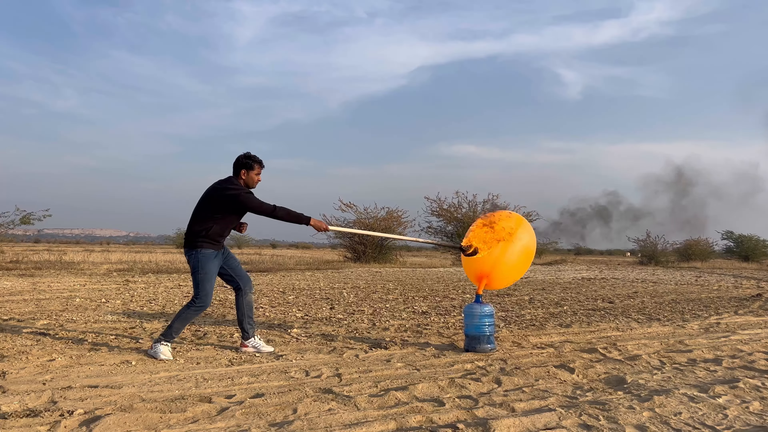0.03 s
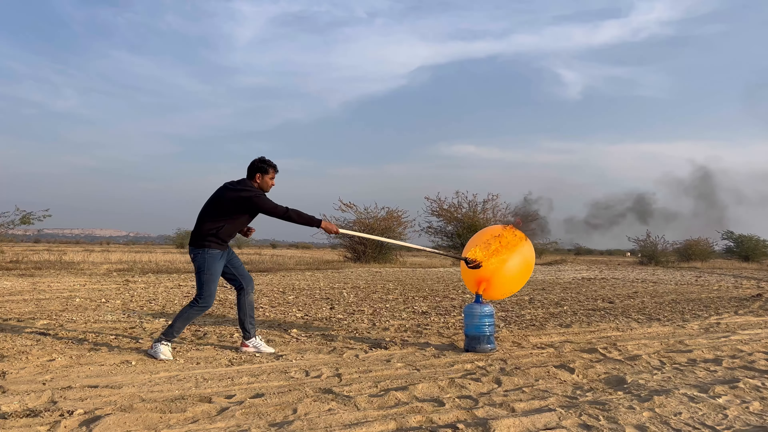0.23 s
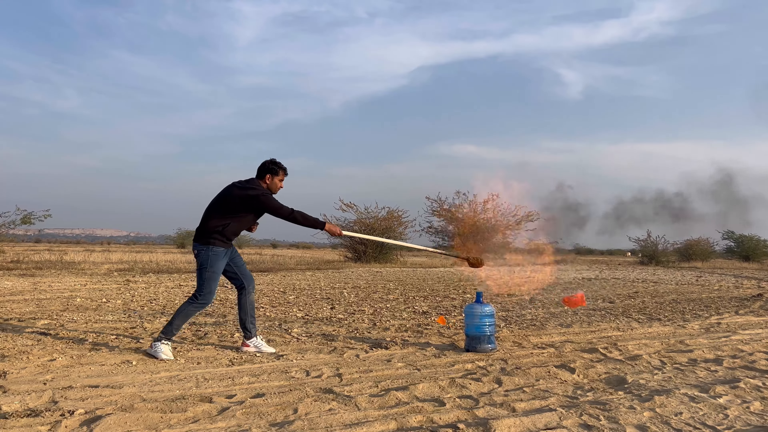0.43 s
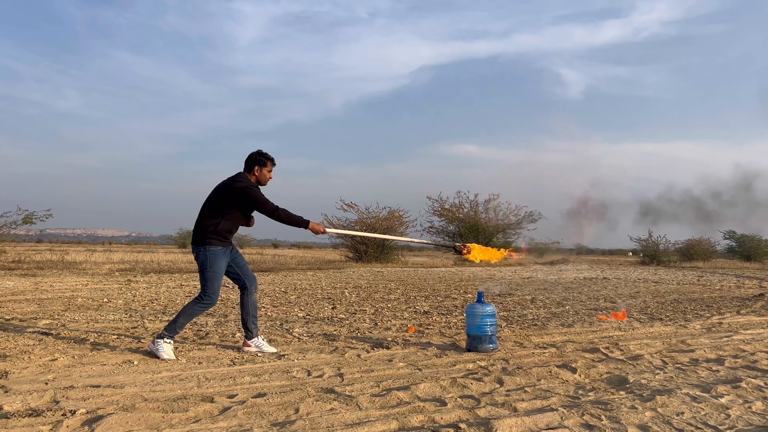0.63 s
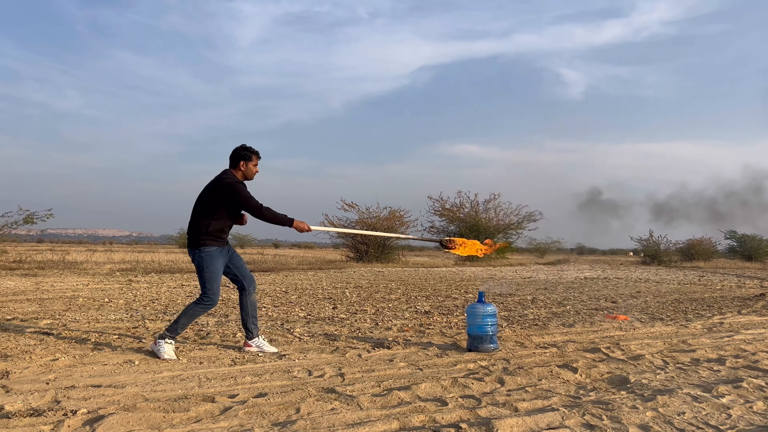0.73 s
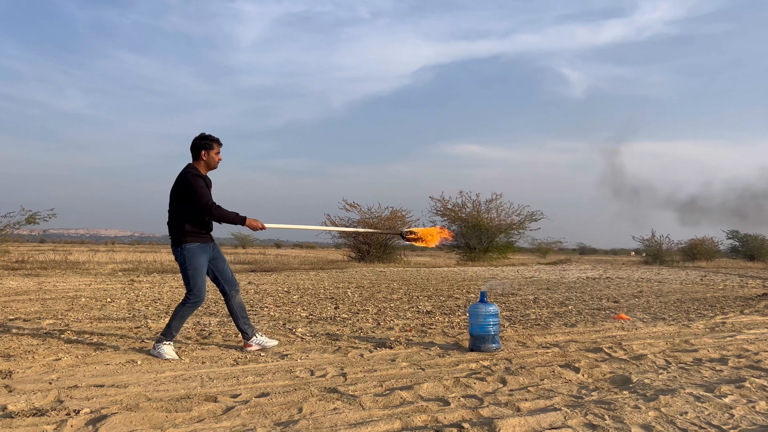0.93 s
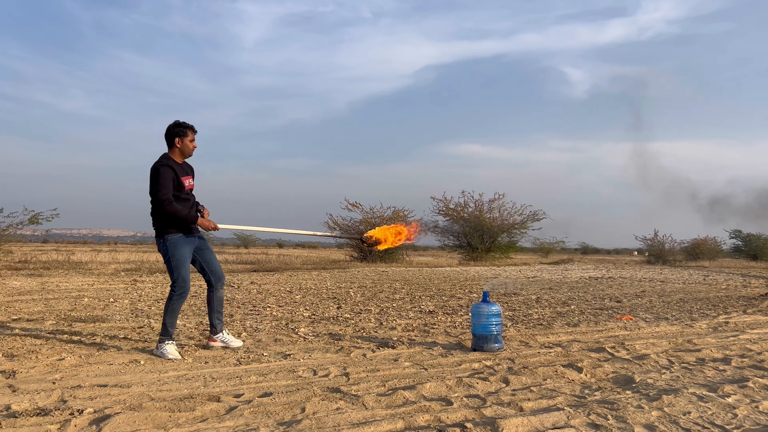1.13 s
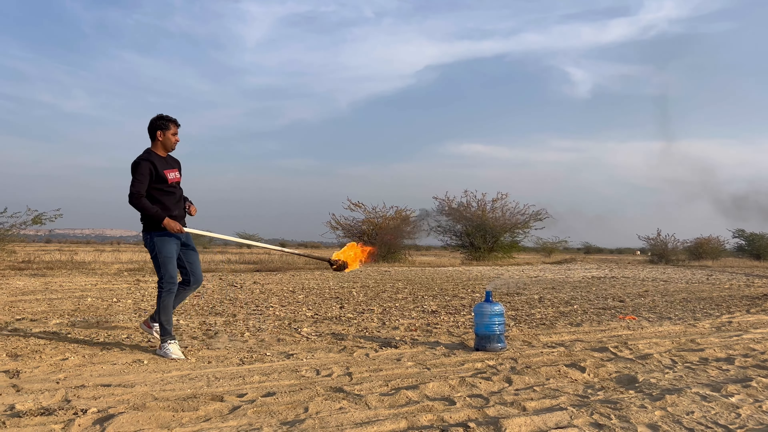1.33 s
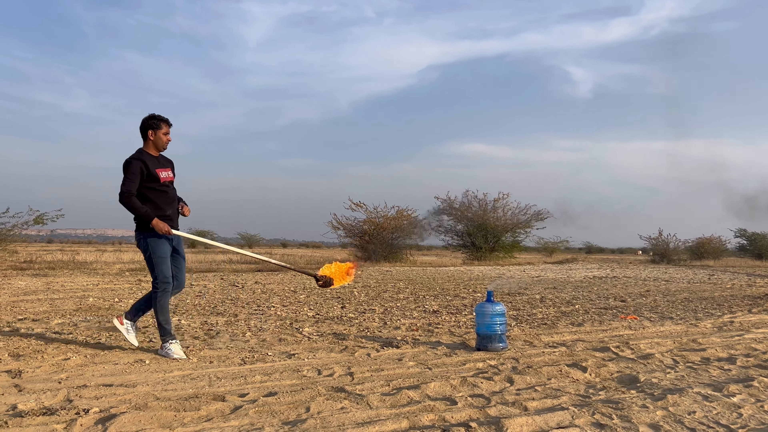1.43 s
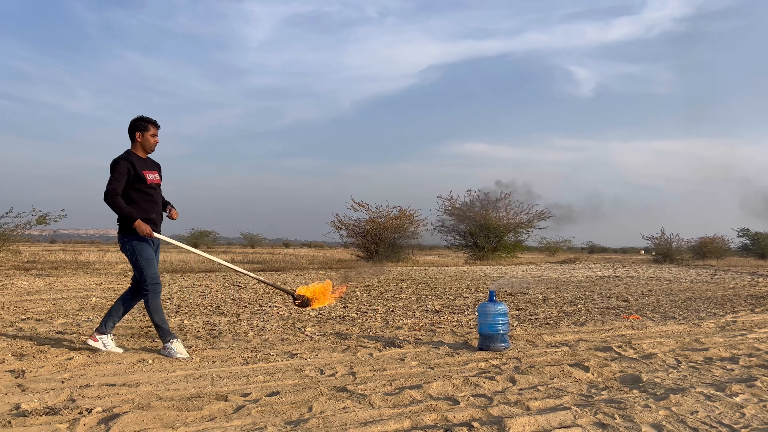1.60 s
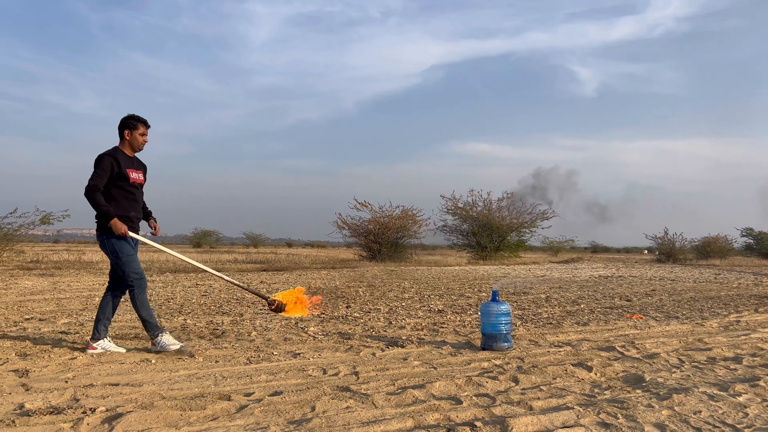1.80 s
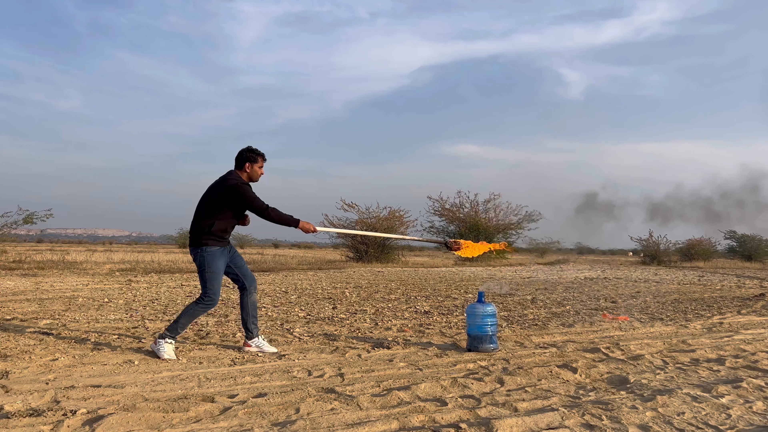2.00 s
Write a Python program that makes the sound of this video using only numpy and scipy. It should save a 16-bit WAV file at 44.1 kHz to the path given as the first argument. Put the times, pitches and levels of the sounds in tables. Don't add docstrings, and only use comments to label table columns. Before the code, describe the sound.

Single balloon gas explosion in an open field, a punchy boom followed by a rolling low rush

```python
import sys
import numpy as np
from scipy import signal
from scipy.io import wavfile

SR = 44100
rng = np.random.default_rng(int(sys.argv[2]) if len(sys.argv) > 2 else 0)


def master(y):
    cut = np.clip(np.atleast_2d(y).T, -1, 1)
    pcm = np.round(cut * 32767)
    wavfile.write(sys.argv[1], SR, pcm.astype(np.int16))


def volts_from_db(level):
    exponent = np.asarray(level, float) / 20
    return 10 ** exponent


N = 90669

# time in seconds, rumble level in dB, rush level in dB, rush tilt in dB per octave.
WIND_LEVELS = [(0, -42, -64, 4.5), (.08, -41.5, -70.5, -3), (.21, -45, -64, -4), (.245, -46, -52, -7.5),
               (.34, -46, -76.5, 4.2), (.42, -46.5, -76.5, 8.2), (.5, -45, -76, 1), (.57, -32, -55.5, 0),
               (.64, -25.5, -52.5, 2), (.81, -23.5, -54, 0.9), (.95, -38.5, -55.5, -1),
               (1.1, -31.5, -53.5, -0.4), (1.25, -31, -55.5, 0.7), (1.38, -27.5, -53.5, 0.9),
               (1.47, -40, -56.5, -1.6), (1.65, -34.5, -55.5, 0.5), (1.8, -38, -58, -1.5),
               (1.99, -34.5, -56.5, -0.7)]
# frequency in Hz, level in dB.
RUMBLE_SPECTRUM = [(20, -22), (30, -10.5), (55, 2.2), (110, -2), (200, -13), (400, -23), (560, -38),
                   (1000, -51)]
# frequency in Hz, level in dB.
RUSH_SPECTRUM = [(400, -12), (650, -3.5), (1400, -2), (1800, -18), (2250, -17.5), (5300, -30),
                 (7500, -42.5), (16300, -59.5)]
# frequency in Hz, side level against mid in dB.
WIND_SIDE = [(60, -78), (110, -75.5), (200, -63), (380, -60), (700, -30.5), (1290, -2.5), (2380, -5.5),
             (4400, -5), (8120, -4), (15000, -4)]
HISS_DB = -88.5

# start in seconds, frequency in Hz, peak in dB, swell time in seconds, sharpness (no unit).
FIREBALL_THROBS = [(.2502, 324, -6.5, 0.0086, 2.3), (.2575, 186., -5, .014, 1.6), (.251, 84., -9, .02, 1.8),
                   (.2805, 104.3, -1.5, .017, 5.8), (.2535, 405., -10.5, 0.0069, 1.6),
                   (.2555, 238., -9, 0.0055, 1.5), (.256, 53, -13, 0.018, 2.7),
                   (.2795, 172., -8, 0.0093, 2.2), (.3, 61, -22, 0.017, 2.25),
                   (.253, 1120., -19, 0.0065, 2.2), (.254, 1700., -20.5, .006, 2.2),
                   (.255, 665., -20, .007, 2.2), (.252, 555., -20, .006, 1.8), (.254, 870., -22, .005, 1.8),
                   (.2555, 1420., -24, .005, 1.8)]

CRACK_START_S, CRACK_RISE_S, CRACK_HOLD_S = 0.2515, 0.0045, 0.0065
CRACK_DB = -18.5
CRACK_DROP_S, CRACK_DROP_DB = 0.278, -12
EMBER_DB, EMBER_T60_S = -30, 0.14
CRACK_RIGHT = 0.39
# frequency in Hz, level in dB.
CRACK_SPECTRUM = [(300, -21), (480, -4), (800, -9), (1700, -14), (2500, -25.5), (4200, -25), (6500, -39.5),
                  (16300, -43.5)]
# frequency in Hz, time to fall by 60 dB in seconds.
CRACK_DECAY = [(500, 0.12), (1200, 0.041), (3000, 0.089), (7000, .16), (14000, 0.18)]
# frequency in Hz, side level against mid in dB.
CRACK_WIDTH = [(60, -65), (110, -67), (200, -70), (380, -54), (700, -18.5), (1290, -3.5), (2380, -11),
               (4400, -5.5), (8120, 0), (15000, -1)]

# time in seconds, peak in dB, highest frequency in Hz.
FLAME_TICKS = [
    (.667, -61, 8800),
    (0.705, -63.5, 9050),
    (0.837, -53, 7200),
    (1.038, -54, 5000.),
    (1.631, -54.5, 7900),
    (1.9576, -52.5, 15540),
    (1.9623, -58.5, 11000.),
    (.402, -64.5, 6000.),
]

# delay in seconds, level in dB, lowest Hz kept, highest Hz kept.
FIELD_ECHOES = [
    (.799, -17, 39.6, 150.),
    (.908, -26, 50., 196),
    (1.062, -19, 140., 600.),
    (1.091, -23, 200., 750.),
    (1.233, -34, 40.3, 196),
    (1.35, -28.5, 39.3, 414),
]
# start in seconds, frequency in Hz, peak in dB, swell time in seconds, sharpness (no unit).
HARD_KNOCKS = [
    (1.056, 783, -26.5, 0.0033, 2.6),
    (1.0565, 546, -30.5, 0.0037, 2.7),
    (1.058, 1270, -40, 0.0014, 2.1),
    (1.0575, 97., -13, 0.0092, 2.4),
    (1.1785, 101, -19, 0.0075, 1.8),
    (1.352, 750., -40, .002, 1.5),
    (1.054, 370., -28, .005, 1.8),
    (1.385, 623, -42, .002, 1.5),
    (1.036, 900., -44, .002, 1.5),
]

SPLICE_S = 1.98739
SPLICE_STEP_DB = -32
# start in seconds, frequency in Hz, peak in dB, swell time in seconds, sharpness (no unit).
SLOWED_SWELLS = [
    (1.988, 9.5, -18.5, .028, 2.2),
    (2.021, 36., -26, .008, 2.2),
    (2.04, 14., -20.5, .018, .8),
]
GRIT_DB, GRIT_TOP_HZ = -49, 260

# frequency in Hz, width in Hz, boost or dip in dB.
HOUSING_RESONANCES = [(1130, 150., 1), (1346, 81, 4.5), (2200, 280, 5), (3636, 170, 3.5), (5000, 400, 2),
                      (7480, 800., 4.5), (1782, 300, -4.5), (3030, 230, -1.5), (9880, 700., -9),
                      (13500, 500., -15.5), (15000, 1200., 3.5)]
# low edge in Hz, high edge in Hz.
ALIKE_BANDS = [(7200, 8300), (10900, 12400), (15000, 19000)]


def at_hz(points, hz):
    table_hz, values = np.array(points)[:, 0], np.array(points)[:, 1]
    return np.interp(np.log(hz), np.log(table_hz), values)


def rms_one(x):
    return x / np.sqrt(np.mean(x ** 2) + 1e-20)


def drift(rate):
    pole = np.exp(-80 * np.pi * rate / SR)
    white = rng.standard_normal(N // 40 + 2002)
    slow = signal.lfilter([1], [1, -2 * pole, pole * pole], white)[2000:]
    return np.interp(np.arange(N) / 40, np.arange(len(slow)), rms_one(slow))


def cut(x, hz, kind, order=2):
    return signal.sosfilt(signal.butter(order, hz, kind, fs=SR, output="sos"), x)


def bands(spectrum, side_db, shape_db, tied):
    tied = np.clip(tied, 0, 1)
    edges = 22 * 2 ** (np.arange(0, 30) / 3)
    white = rng.standard_normal((2, 2, N))
    out, power = np.zeros((2, N)), 0
    for k, (low, high) in enumerate(zip(edges, edges[1:])):
        hz = np.sqrt(low * high)
        if spectrum[0][0] < hz < spectrum[-1][0]:
            mid, other = cut(white[k % 2], [low, high], "band")
            turned = np.gradient(mid) * SR / (2 * np.pi * hz)
            side = volts_from_db(at_hz(side_db, hz)) * (np.sqrt(1 - tied ** 2) * other + tied * turned)
            level_db = at_hz(spectrum, hz)
            out += volts_from_db(level_db + shape_db(hz)) * np.array([mid, side])
            power += volts_from_db(2 * level_db) * np.mean(mid ** 2)
    return out / np.sqrt(power)


def throbs(rows):
    out = np.zeros(N)
    for start, hz, db, swell, sharpness in rows:
        t = np.maximum(np.arange(N) / SR - start, 0)
        envelope = (t / swell * np.exp(1 - t / swell)) ** sharpness
        out += volts_from_db(db) * envelope * np.sin(2 * np.pi * hz * t)
    return out


def field():
    s, *columns = np.transpose(WIND_LEVELS)
    low, high, tilt = (np.interp(np.arange(N) / SR, s, column) for column in columns)
    gust = drift(11)

    def rumble_db(hz):
        lumps = 1.5 * gust + 1.4 * drift(18)
        toward_rush = 0.2 * (high - low + 22) * max(np.log2(hz / 120), 0)
        loud_is_deeper = 0.1 * (low + 35) * np.log2(hz / 80)
        return low + lumps + toward_rush - loud_is_deeper

    def rush_db(hz):
        return high + tilt * np.log2(hz / 1500) + 0.49 * gust + 0.46 * drift(12)

    rumble = bands(RUMBLE_SPECTRUM, WIND_SIDE, rumble_db, tied=0.4)
    rush = bands(RUSH_SPECTRUM, WIND_SIDE, rush_db, tied=0.45)
    hiss = cut(rng.standard_normal((2, N)), 900, "high")
    return rumble + rush + volts_from_db(HISS_DB + 0.3 * (high + 53.5)) * hiss


def fireball():
    return throbs(FIREBALL_THROBS)


def crack():
    t = np.arange(N) / SR - CRACK_START_S
    flicker = drift(360)
    rise = 20 * np.log10(np.clip(t / CRACK_RISE_S, 1e-6, 1))
    late = np.maximum(t - CRACK_RISE_S - CRACK_HOLD_S, 0)
    drop = CRACK_DROP_DB * np.clip((t + CRACK_START_S - CRACK_DROP_S) / 0.0025, 0, 1)

    def crack_db(hz):
        tear = drop * (hz > 2500) - 60 * late / at_hz(CRACK_DECAY, hz)
        ember = EMBER_DB - 60 * late / EMBER_T60_S + 2.5 * drift(120)
        return np.maximum(rise + np.maximum(tear, ember) + 3.6 * flicker, -150)

    return volts_from_db(CRACK_DB) * bands(CRACK_SPECTRUM, CRACK_WIDTH, crack_db, tied=0.8)


def ticks():
    out = np.zeros((2, N))
    sides = rng.uniform(-1, 1, len(FLAME_TICKS))
    for (s, db, top_hz), side in zip(FLAME_TICKS, sides):
        burst = rng.standard_normal(120) * np.exp(-np.arange(120) / 22)
        snap = cut(burst, [2500, top_hz], "band")
        start = int(s * SR)
        out[:, start:start + len(snap)] += volts_from_db(db) * snap * [[1], [side]]
    return out


def knocks():
    return throbs(HARD_KNOCKS)


def echoes(bang):
    out = np.zeros(N)
    for delay, db, low_hz, high_hz in FIELD_ECHOES:
        out += volts_from_db(db) * np.roll(cut(bang, [low_hz, high_hz], "band"), int(delay * SR))
    return out


def slowed():
    t = np.arange(N) / SR - SPLICE_S
    dull = cut(rng.standard_normal(N), GRIT_TOP_HZ, "low", order=3)
    grit = rms_one(cut(dull, 60, "high")) * np.clip(t / 0.029, 0, 1)
    suction, push = throbs(SLOWED_SWELLS[:1]), throbs(SLOWED_SWELLS[1:])
    return push - suction + volts_from_db(GRIT_DB) * grit


def ports(x):
    mid, side = (x[0] + x[1]) / 2, (x[0] - x[1]) / 2
    for hz, width, db in HOUSING_RESONANCES:
        ring = signal.iirpeak(hz, hz / width, fs=SR)
        mid = mid + (volts_from_db(db) - 1) * signal.lfilter(*ring, mid)
        side = side + (volts_from_db(db) - 1) * signal.lfilter(*ring, side) * (hz < 9000)
    for gap in ALIKE_BANDS:
        side = cut(side, gap, "bandstop", order=5)
    return np.array([mid + side, mid - side])


def scene():
    mid, side = crack()
    mid = mid + fireball()
    lean = cut(cut(mid, [750, 1900], "band"), 600, "high", order=4)
    knock = knocks()
    side = side - CRACK_RIGHT * lean + 0.22 * cut(knock, 750, "high", order=4)
    mid = mid + knock + echoes(mid)
    mid, side = np.array([mid, side]) + field() + ticks()

    t = np.arange(N) / SR - SPLICE_S
    fade = np.clip(-t / 0.004, 0, 1)
    step = volts_from_db(SPLICE_STEP_DB) * np.exp(np.minimum(t, 0) / 0.0047)
    mid = mid * fade - step
    return np.where(t < 0, np.array([mid + side, mid - side]), slowed())


def low_pass(x):
    return signal.sosfilt(signal.butter(12, 16480, fs=SR, output="sos"), x)


def record(dry):
    mix = np.tanh(ports(dry))
    return low_pass(mix)


dry = scene()
out = record(dry)
master(out)
```